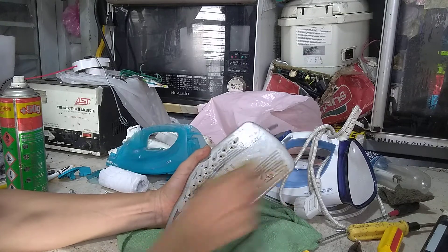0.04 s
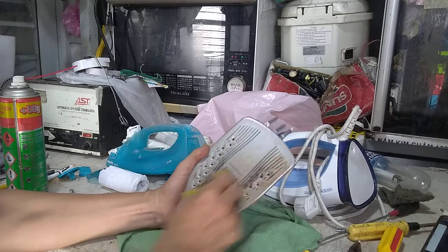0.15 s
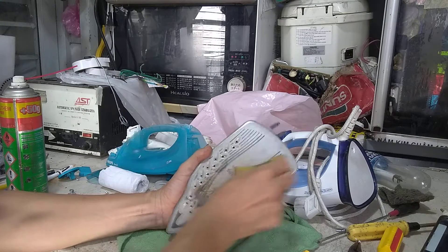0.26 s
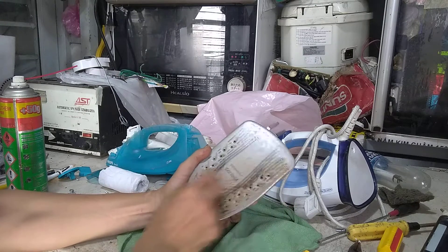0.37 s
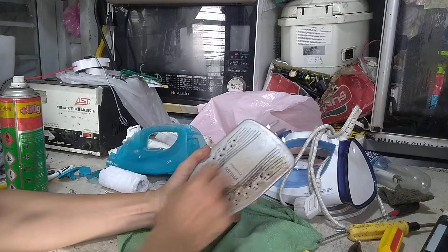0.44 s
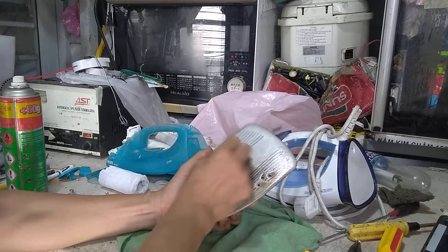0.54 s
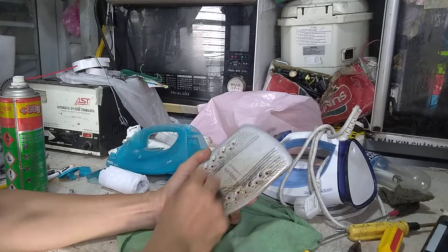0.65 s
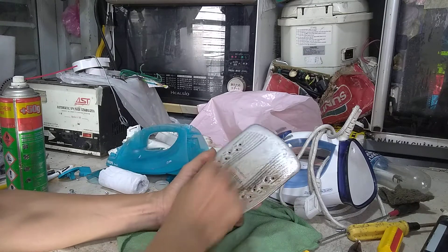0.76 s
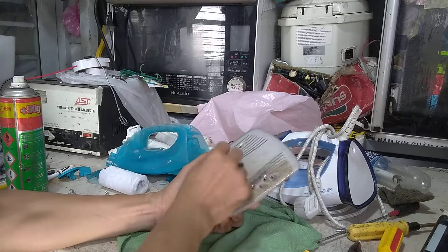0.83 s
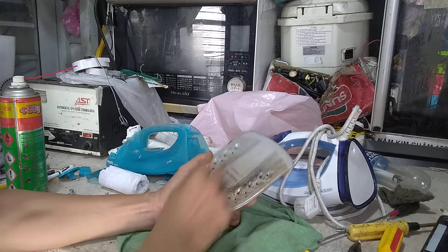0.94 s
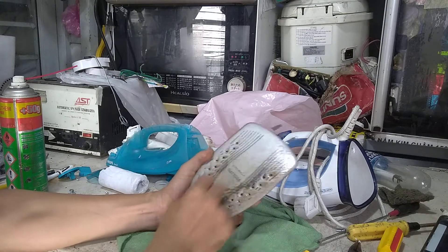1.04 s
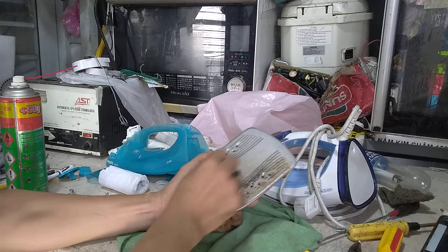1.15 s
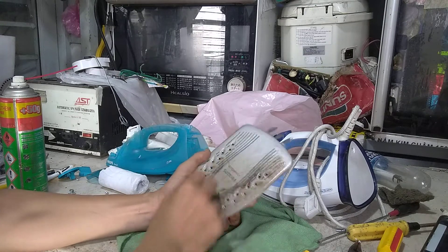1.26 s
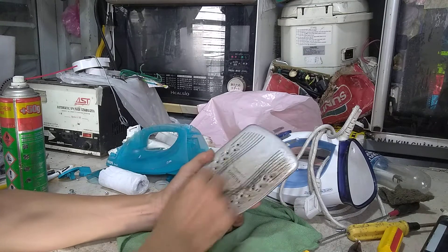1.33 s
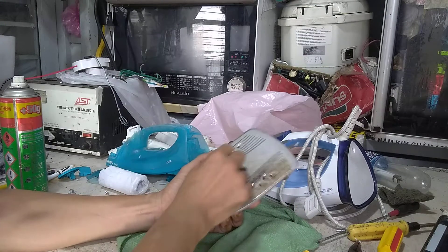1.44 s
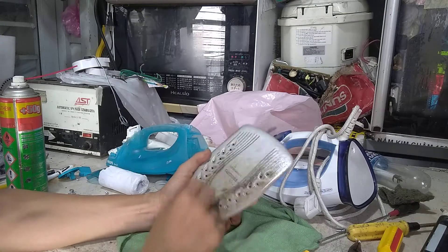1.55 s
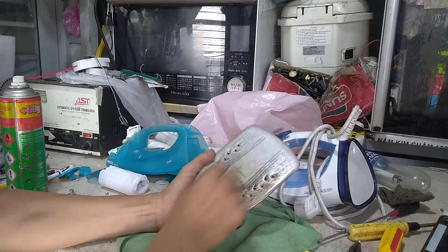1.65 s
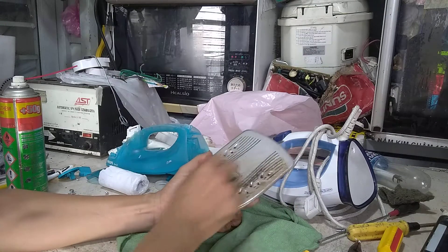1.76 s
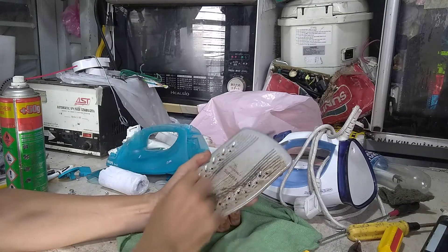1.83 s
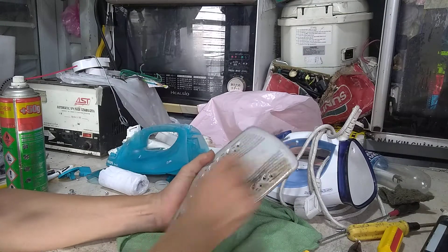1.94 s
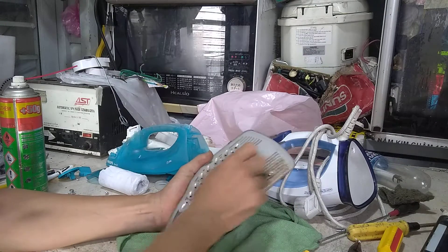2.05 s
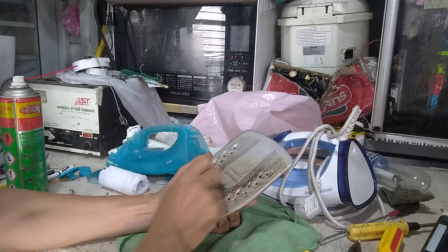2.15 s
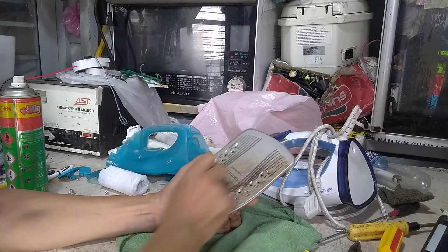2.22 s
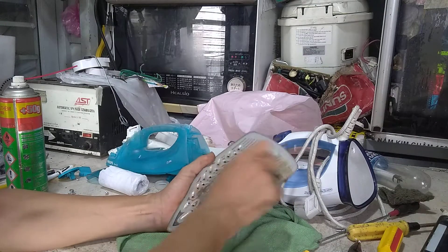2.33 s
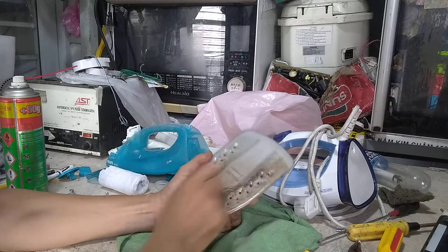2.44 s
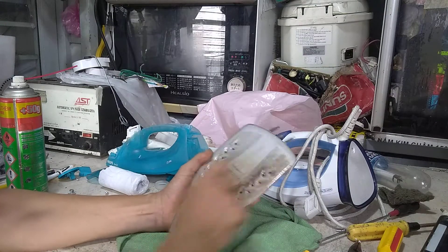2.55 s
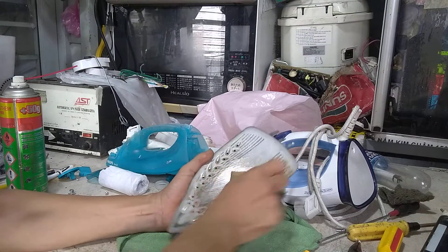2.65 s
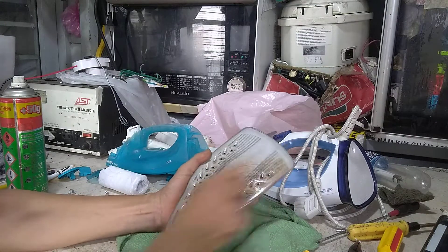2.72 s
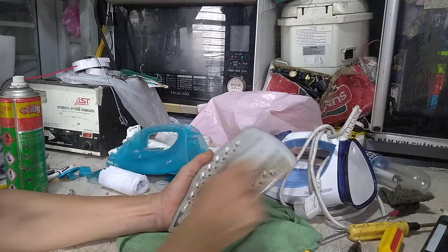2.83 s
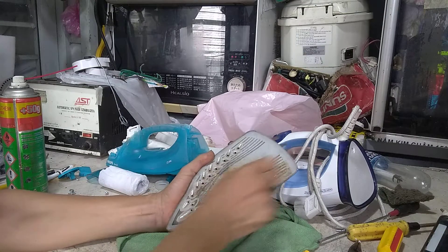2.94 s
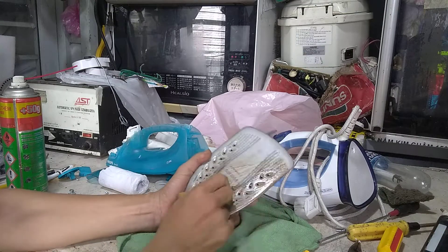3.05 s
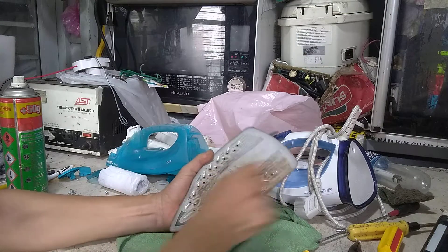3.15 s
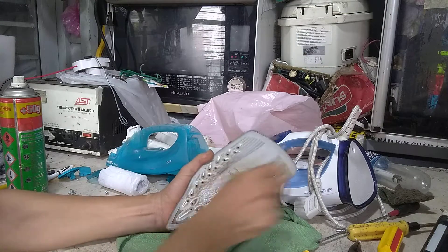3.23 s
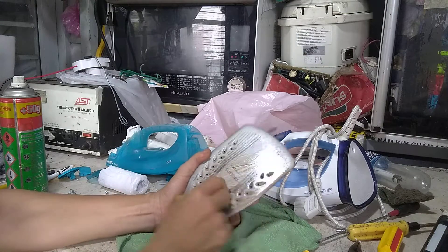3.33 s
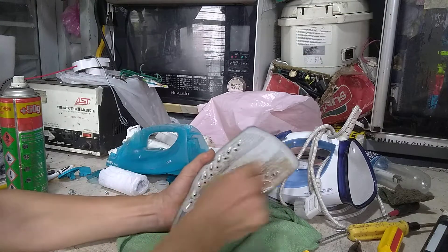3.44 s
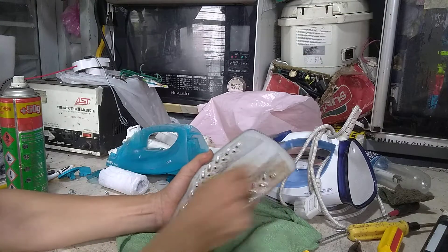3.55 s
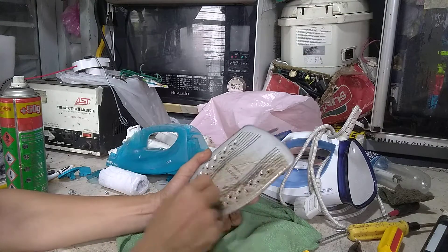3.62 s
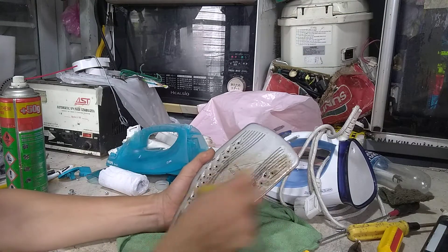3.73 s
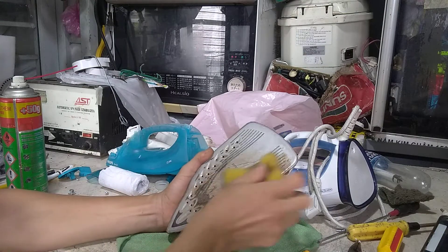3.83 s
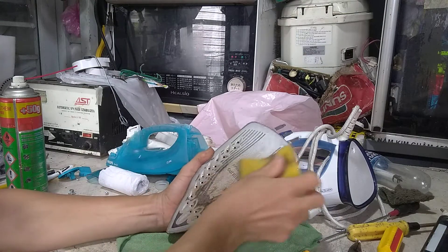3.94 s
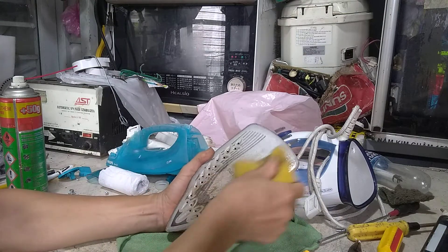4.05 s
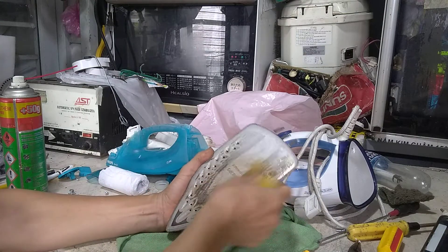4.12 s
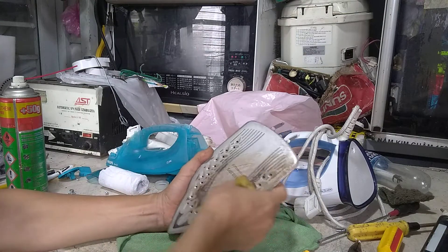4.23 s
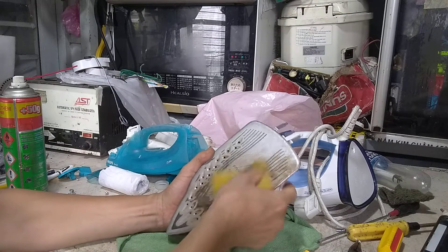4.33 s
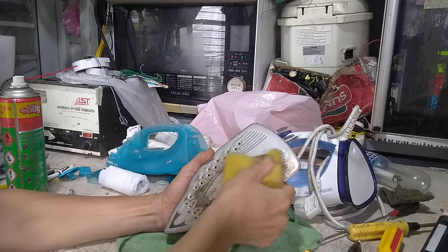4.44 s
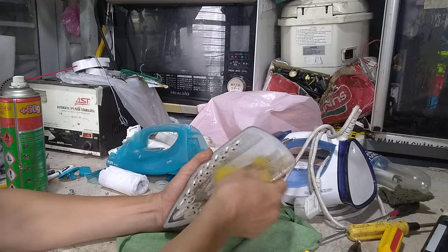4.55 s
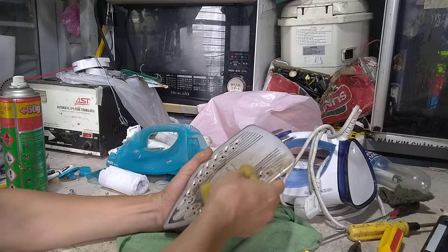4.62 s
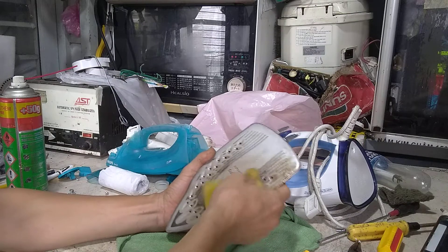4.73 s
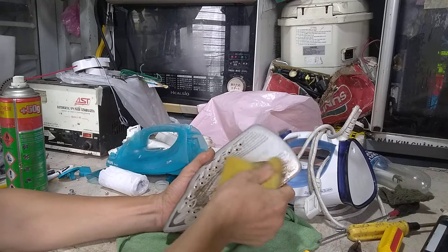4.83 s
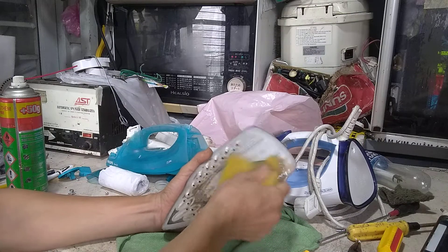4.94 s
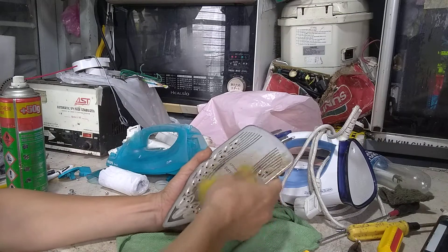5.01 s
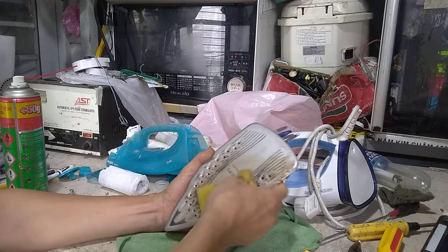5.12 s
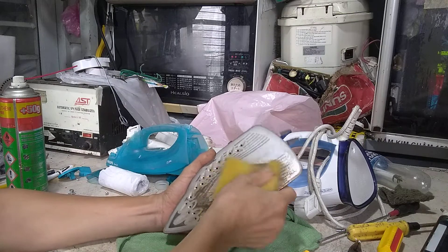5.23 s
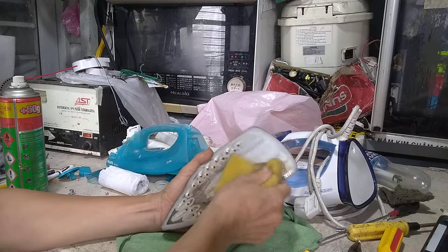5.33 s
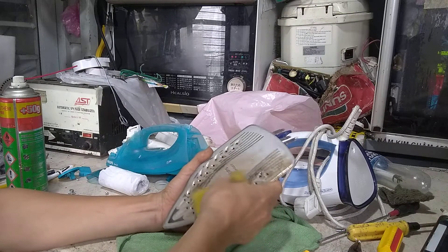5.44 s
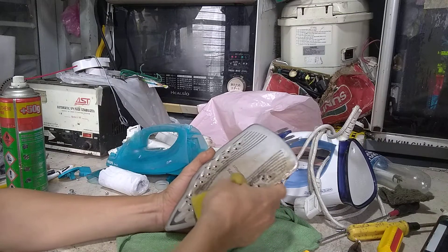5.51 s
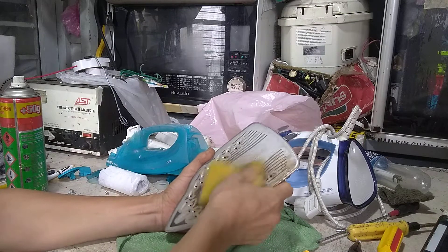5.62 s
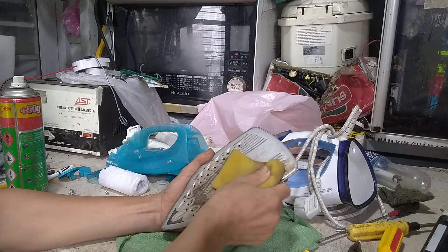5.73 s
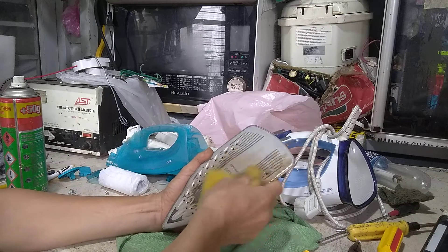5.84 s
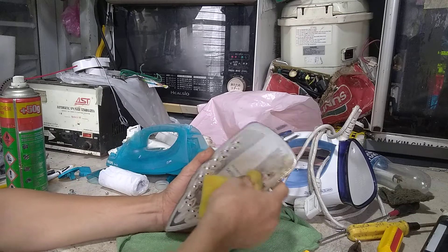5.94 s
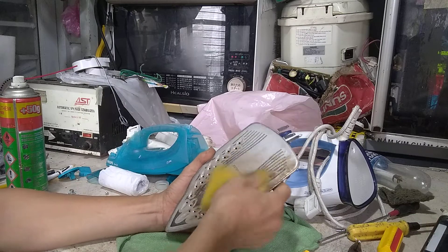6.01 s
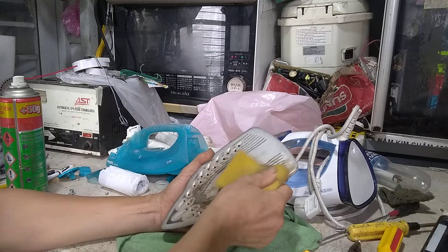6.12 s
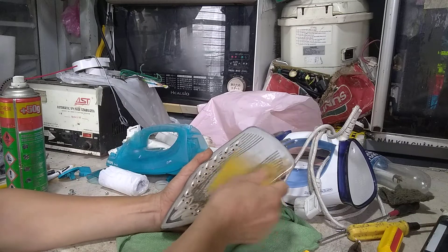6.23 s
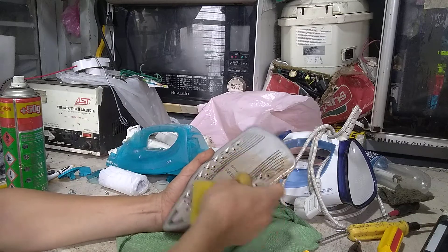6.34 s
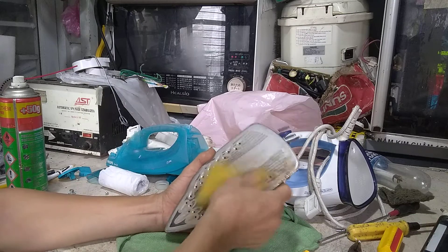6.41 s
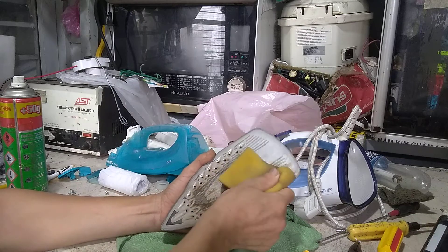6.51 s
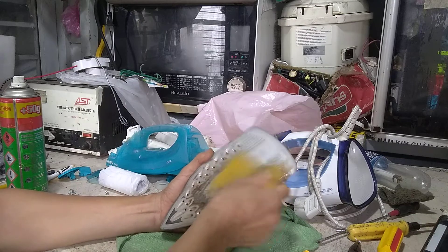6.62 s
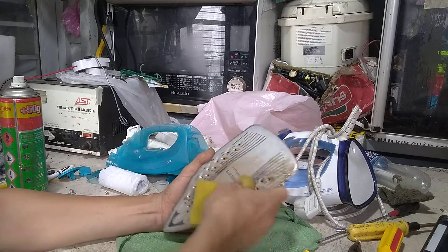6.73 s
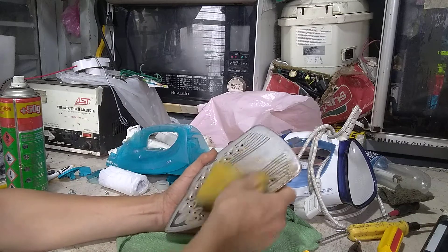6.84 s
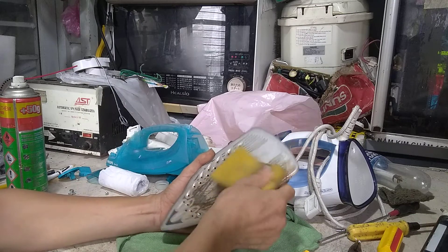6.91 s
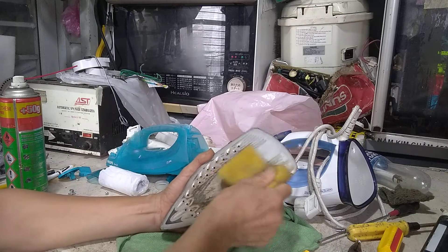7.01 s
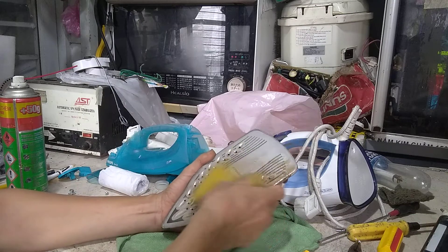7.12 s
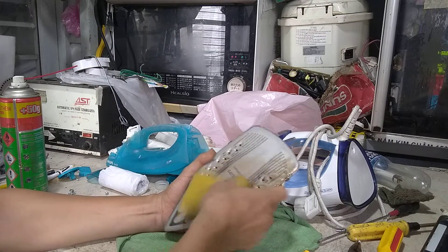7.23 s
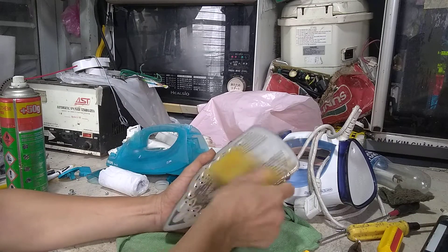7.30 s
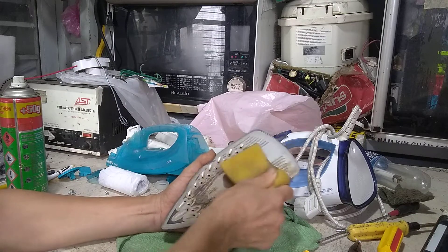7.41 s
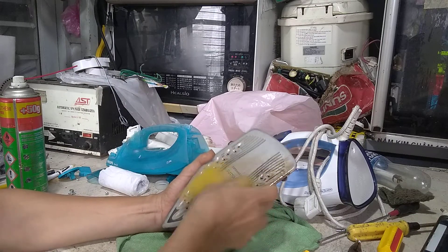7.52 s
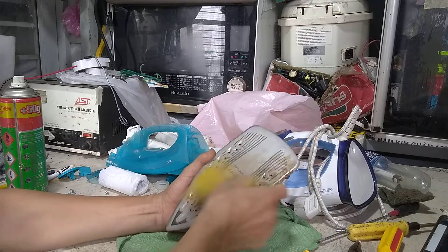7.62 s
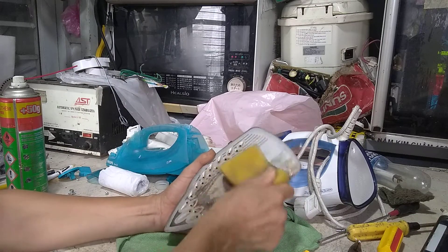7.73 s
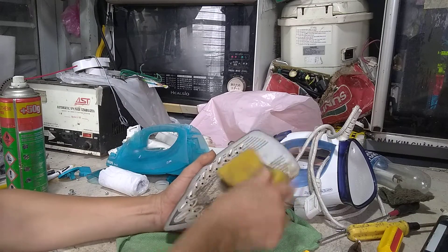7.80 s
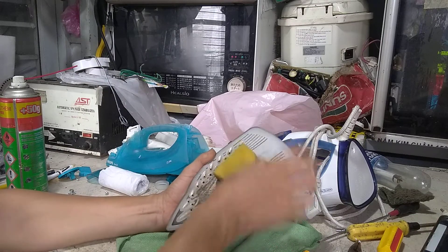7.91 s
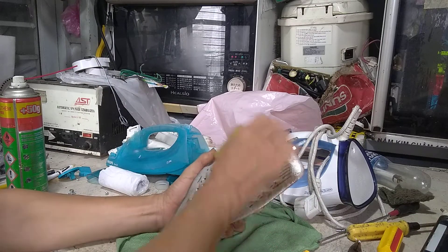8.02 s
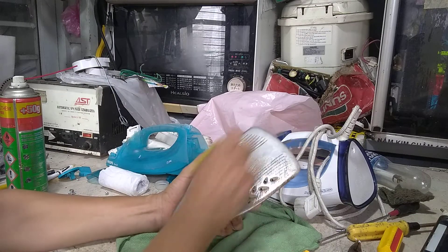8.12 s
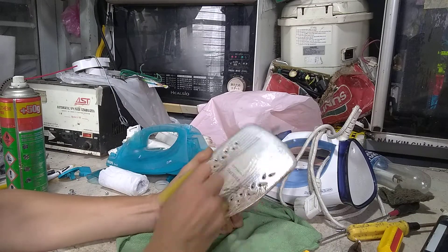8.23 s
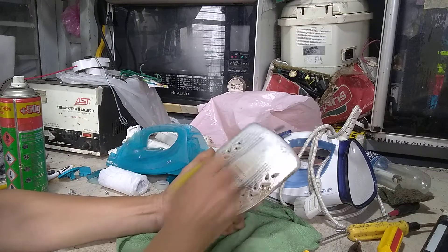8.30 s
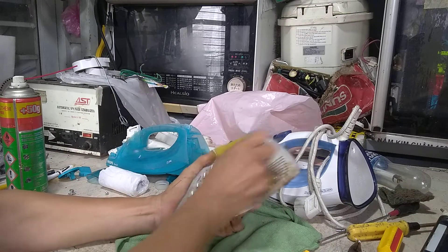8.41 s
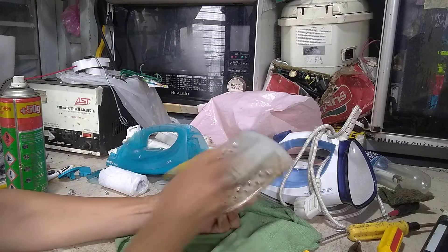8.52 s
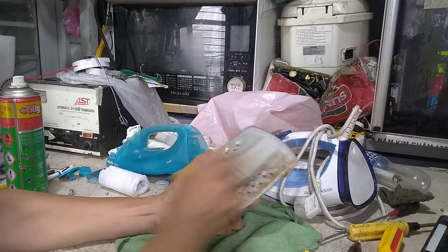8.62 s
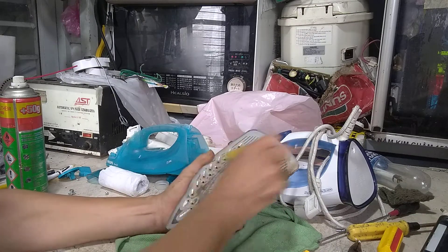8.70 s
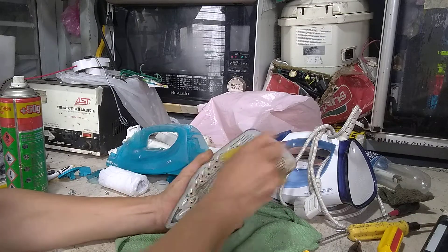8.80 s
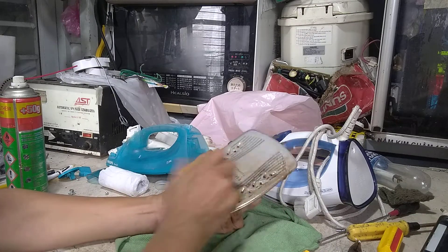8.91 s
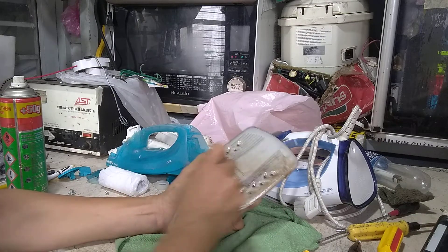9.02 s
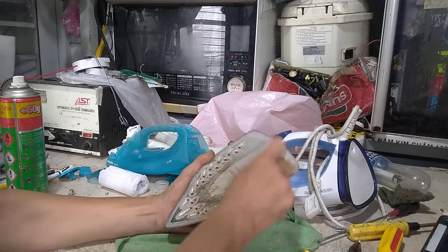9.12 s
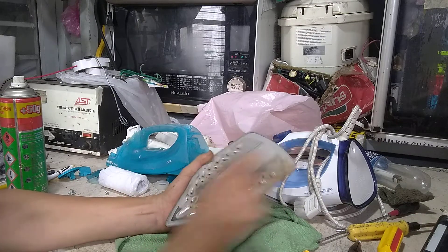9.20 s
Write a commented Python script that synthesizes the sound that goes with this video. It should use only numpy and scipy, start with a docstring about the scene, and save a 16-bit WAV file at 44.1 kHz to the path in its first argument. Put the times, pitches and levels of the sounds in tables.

```python
"""Scouring the plate of a clothes iron

A wet scouring sponge scrubs the metal soleplate of a hand-held clothes iron over a workbench.
Each stroke drags fibres across the plate (grains of noise coloured as hiss and rasp) and shakes the hollow
housing (low noise and ringing modes). Light glides, fizzing liquid, snags (decaying noise), squeaks (wavering
tones), bumps and a shifting grip join in over faint room air. Two close microphone ports listen."""
import sys
import numpy as np
from scipy import signal
from scipy.fft import rfft, irfft, next_fast_len
from scipy.io import wavfile

SR = 44100
rng = np.random.default_rng(int(sys.argv[2]) if len(sys.argv) > 2 else 0)


def output_pcm(signal):
    """Save a mono or channel-first signal as 16-bit PCM at the path in sys.argv[1].

    Samples are clipped to [-1, 1] before scaling.
    """
    pcm = np.clip(np.atleast_2d(signal).T, -1, 1) * 32767
    wavfile.write(sys.argv[1], SR, np.round(pcm).astype(np.int16))


N = 408366
TIME = np.arange(N) / SR


def from_db(db):
    """Decibels to gain."""
    return 10 ** (np.asarray(db) / 20)


def rms_one(x):
    """Scale to unit power."""
    return x / np.sqrt(np.mean(x ** 2) + 1e-20)


def ease(x):
    """A smooth step from 0 to 1."""
    return np.sin(np.pi / 2 * np.clip(x, 0, 1)) ** 2


def in_time(rows):
    """The columns of a control curve at every sample."""
    s, *columns = np.transpose(rows)
    return np.squeeze([np.interp(TIME, s, column) for column in columns])


def at_hz(points, hz):
    """Read a spectrum on a log-frequency axis."""
    knots, values = np.transpose(points)
    return np.interp(np.log(hz + 1), np.log(knots), values)


def swells(rows, width_s):
    """Gain of short bell-shaped swells."""
    gain = 0
    for s, level_db in rows:
        offset = np.minimum(np.abs(TIME - s) / width_s, 10)
        gain = gain + from_db(level_db) * np.exp(-offset ** 2)
    return gain


def drift(rate):
    """Slow chance with spread 1: a new value twice per cycle, straight lines between."""
    knots = rng.standard_normal(N // 32)
    return rms_one(np.interp(2 * rate * TIME, np.arange(len(knots)), knots))


def grains(per_s, spread_db):
    """Tiny slips at random moments, of uneven size, independent in two channels."""
    chance = rng.random((2, N), dtype=np.float32) * 2 - 1
    rank = np.abs(chance) * np.float32(SR / per_s) + 1e-9
    rarity = np.minimum(-np.log(rank), 4)
    sizes = np.exp(rarity * np.float32(spread_db * np.log(10) / 20))
    return np.sign(chance) * sizes * (rank < 1)  # only ranks below 1 sound


def colour(x, spectrum, edge_hz=15, resonances=()):
    """Give steady noise a spectrum with a steep lower edge and narrow resonances; unit power."""
    hz = np.fft.rfftfreq(4096, 1 / SR)
    lower_edge = np.sqrt(1 + np.minimum(edge_hz / (hz + 1), 2) ** 160)
    gain = from_db(at_hz(spectrum, hz)) / lower_edge
    for centre, width, boost_db in resonances:
        gain = gain * from_db(boost_db / (1 + (2 * (hz - centre) / width) ** 2))
    kernel = np.float32(np.fft.fftshift(irfft(gain)))
    return rms_one(signal.oaconvolve(np.float32(x), kernel[None], "same", axes=1))


def linger(gain, t60, room_db):
    """The cluttered room holds a little of the power for a moment."""
    r = from_db(-120 / (t60 * SR))  # twice 60 dB, because it is power that decays
    held_power = signal.lfilter([1 - r], [1, -r], gain ** 2 + 1e-18)
    return np.sqrt(gain ** 2 + from_db(room_db) ** 2 * held_power)


# Scouring strokes. Each row: moment the fibres bite in seconds, end in seconds,
# relative hiss level at mid-stroke in dB, rise in level over the stroke as the pressure changes in dB.
SCOURING_STROKES = [(0.073, 0.178, -38.5, 9), (0.195, 0.323, -37, -9), (0.336, 0.479, -40, 6),
                    (0.5, 0.554, -40, -11), (1.701, 1.746, -36.5, -16), (1.952, 2.054, -48.5, -18),
                    (2.13, 2.231, -51, -10), (2.308, 2.401, -40.5, -3.5), (2.406, 2.536, -55, -5),
                    (2.601, 2.707, -40.5, -3), (2.769, 2.828, -46.5, -1), (2.861, 2.975, -41, -11),
                    (3.149, 3.264, -39, 6), (3.332, 3.402, -47.5, 0), (3.452, 3.533, -46.0, -7),
                    (4.336, 4.443, -38.5, 3), (4.415, 4.509, -45.5, -4), (4.569, 4.7, -40.0, 10),
                    (4.771, 4.946, -37.5, -4), (5.009, 5.118, -37.0, -6.5), (5.182, 5.339, -34.0, 2.5),
                    (5.409, 5.544, -38.0, -6), (5.578, 5.783, -33.5, 24.5), (5.84, 5.944, -37.0, -10),
                    (6.017, 6.222, -38.0, -4.5), (6.275, 6.378, -36.5, -11), (6.381, 6.6, -34, 9.5),
                    (6.645, 6.767, -36.5, 1), (6.827, 7.039, -36, -8), (7.084, 7.241, -38.5, -7),
                    (7.274, 7.443, -32.5, 2), (7.5, 7.623, -38, -5), (7.671, 7.798, -33.5, -4),
                    (8.24, 8.295, -36.0, -11), (8.318, 8.442, -41.5, -12), (8.549, 8.615, -38.5, -1),
                    (8.644, 8.765, -40.0, -18)]
# The pad first slides softly (level relative to the bite), then its fibres take hold.
SLIDE_S, SLIDE_DB, BITE_S = 0.03, -23, 0.026
# Every stroke gets up to speed in the same time and slows over the same share of its length.
SPEED_UP_S, SLOWING_SHARE = 0.08, .52


def stroke_gains():
    """The pad slides, bites, presses on and slows to its turn; gain of the hiss."""
    power = np.zeros(N)
    for start, end, level_db, lean_db in SCOURING_STROKES:
        span = slice(max(int((start - SLIDE_S) * SR), 0), int(end * SR))
        t = TIME[span] - start
        along = np.clip(t / (end - start), 0, 1)
        motion = ease((t + SLIDE_S) / SPEED_UP_S) * ease((1 - along) / SLOWING_SHARE)
        friction = from_db(SLIDE_DB) + ease(t / BITE_S)
        pressure = from_db(level_db + lean_db * (along - .5))
        power[span] += (motion * friction * pressure) ** 2
    return np.sqrt(power)


# The pad runs into the plate's rim and grates over it.
# Each row: centre of the swell in seconds, relative rasp level in dB.
RIM_GRATINGS = [(2.645, -52.5), (8.27, -49.5), (8.581, -41.5)]
RIM_HIT_S = .017
# Rasp gain relative to the hiss gain: lower when the pad is flat; fingers bearing down raise it.
RASP_FLAT_DB, RASP_EDGE_DB, RASP_FINGERS_DB = -25.5, -14.5, 13


def rasp_gains(hiss_gain, flat, covered):
    """The rasp follows the hiss, stronger on the pad's edge and under fingers, and swells at the rim."""
    rasp_db = RASP_FLAT_DB * flat + RASP_EDGE_DB * (1 - flat) + RASP_FINGERS_DB * covered
    return np.hypot(hiss_gain * from_db(rasp_db), swells(RIM_GRATINGS, RIM_HIT_S))


def bench_echo(x, delay_s=.0024, sway_s=0.000492, echo_db=-1.0):
    """The bench returns the scratching; the path changes as the hand moves."""
    late = TIME - delay_s - sway_s * drift(rate=1.2)
    echo = np.array([np.interp(late, TIME, channel) for channel in x])
    return rms_one(x + from_db(echo_db) * echo)


def muffled(x, corner_hz=8500):
    """Fingers over the contact take off the top of the hiss."""
    lowpass = signal.butter(1, min(corner_hz, .45 * SR), fs=SR, output="sos")
    return rms_one(signal.sosfilt(lowpass, x))


# Spectra of the flat pad's hiss, of the hiss of its edge, and of the rasp.
# Each row: frequency in Hz, relative level in dB.
FLAT_PAD_HISS = [(4750, -30.5), (5100, -6), (5700, -3), (6400, -3.5), (6900, -4), (7500, -2), (8150, 0.5),
                 (8900, -3), (9900, -2.5), (11700, -7), (12400, -7.5), (13200, -4.5), (14200, -23.5)]
PAD_EDGE_HISS = [(4750, -2.5), (5100, -1), (5700, 0), (6300, -0.3), (7000, -1), (8000, -2), (9500, -2.5),
                 (11500, -5.5), (13000, -7.5), (14200, -16)]
FIBRE_RASP = [(600, 3), (1000, 1.5), (1500, 0), (2200, -11), (2900, 1.5), (3800, 8), (4600, -2.5),
              (5200, -3), (6000, -26)]
# Resonances of the soleplate, and of its rim woken by the edge of the pad.
# Each row: centre in Hz, width in Hz, boost in dB (negative is a dip).
PLATE_RESONANCES = [(2804, 40, 12), (2913, 30, 6), (3063, 40, 8), (3866, 45, 7), (5689, 55, 7),
                    (5839, 55, 7), (6193, 70, 4), (6950, 200, -2), (7477, 130, 4), (8170, 170, 2),
                    (8960, 250, -1.5), (10034, 60, 4.5), (10880, 250, 2), (12185, 40, 4), (13717, 80, 6),
                    (13940, 80, 7)]
RIM_RESONANCES = [(1423, 120, 7.5), (1886, 490, 21.5), (2786, 64, 14.5), (3050, 53, 11.5), (3800, 80, -3.5)]
HISS_EDGE_HZ = 5020


def scouring(hiss_gain, rasp_gain, flat, covered):
    """Fibres scratch the plate; flat pad and edge differ in colour, and the friction flutters."""
    flat_hiss = colour(grains(per_s=20000, spread_db=2.0), FLAT_PAD_HISS, HISS_EDGE_HZ, PLATE_RESONANCES)
    edge_hiss = colour(grains(per_s=14000, spread_db=4.5), PAD_EDGE_HISS, HISS_EDGE_HZ)
    open_hiss = np.sqrt(flat) * flat_hiss + np.sqrt(1 - flat) * edge_hiss
    finger_hiss = muffled(colour(grains(per_s=14000, spread_db=5.0), PAD_EDGE_HISS, HISS_EDGE_HZ))
    hiss = np.sqrt(1 - covered) * open_hiss + np.sqrt(covered) * finger_hiss

    flat_rasp = colour(grains(per_s=6000, spread_db=0.5), FIBRE_RASP, 600, PLATE_RESONANCES)
    edge_rasp = colour(grains(per_s=4600, spread_db=2.5), FIBRE_RASP, 610, RIM_RESONANCES)
    rasp = np.sqrt(flat) * flat_rasp + np.sqrt(1 - flat) * edge_rasp

    flutter = drift(rate=220)  # shared by hiss and rasp
    hiss = bench_echo(hiss) * linger(hiss_gain * from_db(0.85 * flutter), t60=0.065, room_db=-7)
    rasp = bench_echo(rasp) * linger(rasp_gain * from_db(0.74 * flutter), t60=0.14, room_db=-4)
    return from_db(1.18) * hiss + from_db(0.5) * rasp


# Modes of the hollow housing. Each row: frequency in Hz, relative level in dB, 60 dB decay in seconds.
HOUSING_MODES = [(210, -21, 0.098), (311, -4, 0.12), (410.2, -2, 0.13), (469, -5, 0.062)]


def housing(force):
    """The modes of the iron's shell, set ringing by a force."""
    out = 0
    for hz, level_db, t60 in HOUSING_MODES:
        r, w = from_db(-60 / (t60 * SR)), 2 * np.pi * hz / SR
        resonator = [1, -2 * r * np.cos(w), r * r]
        out = out + from_db(level_db) * signal.lfilter([.5, 0, -.5], resonator, force + 1e-18)
    return out


# Spectra of the housing's rumble and of the dull thud. Each row: frequency in Hz, relative level in dB.
HOUSING_RUMBLE = [(60, -38), (150, -24), (200, 1.5), (270, -1), (410, 0.5), (550, -4), (750, -12.5),
                  (1000, -27), (1600, -51.5)]
DULL_THUD = [(25, -22), (60, -10.5), (110, -9), (190, 4), (250, -2), (350, -5), (600, -54.5)]


def shaking(gain, flat, give_db=-55, edge_db=3.0):
    """Friction shakes the housing; the thud, fuller on the pad's edge, levels off under a hard push."""
    force = colour(grains(per_s=1500, spread_db=2.5), HOUSING_RUMBLE)
    shell = from_db(-2.5) * force + from_db(-10.0) * rms_one(housing(force))
    push = gain / np.hypot(1, gain / from_db(give_db))  # the soft hand yields to a hard push
    thud_noise = colour(grains(per_s=810, spread_db=1.0), DULL_THUD)
    thud = from_db(edge_db * (1 - flat) - 0.1) * push * thud_noise
    return shell * linger(gain, t60=0.36, room_db=-3.5) + thud


# Light passes that slide on the wet film. Each row: start in seconds, end in seconds, relative level in dB.
LIGHT_GLIDES = [(0.43, 0.624, -54), (0.61, 0.777, -63), (0.767, 0.904, -60.5), (0.926, 1.07, -60.5),
                (1.06, 1.21, -60), (1.245, 1.34, -66.5), (1.353, 1.485, -61), (1.484, 1.86, -60.5),
                (1.828, 1.917, -65), (2.44, 2.92, -62.5), (2.992, 3.124, -59.5), (3.233, 3.494, -67),
                (4.096, 4.278, -59), (8.13, 8.306, -61.5), (8.402, 8.61, -68), (8.662, 8.81, -55),
                (9.047, 9.21, -62), (9.183, 9.32, -60)]
# Fizz of the wet film under the resting pad; it dies away twice as the pad lifts.
# Each row: time in seconds, relative level in dB.
FILM_FIZZ = [(0, -64), (.9, -69.5), (1.35, -72), (2.2, -67.5), (3.5, -67.5), (3.75, -76.5), (4.08, -81.5),
             (4.35, -71.5), (7.83, -71.5), (7.95, -81), (8.08, -80), (8.3, -58), (9.25, -76)]


def glide_gains():
    """Each light pass swells and fades in one arch above the fizz of the film."""
    power = from_db(in_time(FILM_FIZZ)) ** 2
    for start, end, level_db in LIGHT_GLIDES:
        span = slice(int(start * SR), int(end * SR))
        arch = np.sin(np.pi * (TIME[span] - start) / (end - start))
        power[span] += (from_db(level_db) * arch) ** 2
    return np.sqrt(power)


def gliding():
    """The wet film hisses and fizzes faintly, with a soft rub below."""
    film = colour(grains(per_s=2900, spread_db=-0.5), PAD_EDGE_HISS, HISS_EDGE_HZ)
    rub = from_db(-16) * colour(grains(per_s=11000, spread_db=2.0), FIBRE_RASP, edge_hz=600)
    rub += from_db(-30) * colour(grains(per_s=570, spread_db=3.5), HOUSING_RUMBLE)
    return glide_gains() * from_db(0.16 + 2.2 * drift(rate=62)) * (film + rub)


# Fibres catch and let go. Each row: time in seconds, relative tick level in dB,
# relative rasp level in dB, 60 dB ring-down in seconds (a fainter common tail is added).
FIBRE_SNAGS = [(0.213, -44, -41.5, 0.2), (0.242, -25, -33.5, 0.099), (0.517, -27, -50, 0.014),
               (.5228, -39.5, -56, .035), (1.709, -30, -86, 0.027), (2.8795, -37, -71, .02),
               (2.916, -35, -61, 0.025), (3.4693, -25, -50.5, 0.049), (4.4493, -30, -59, 0.034),
               (5.496, -45, -46.5, 0.093), (6.03, -35, -59, .02), (6.391, -27.5, -56.5, 0.042),
               (6.398, -27, -54, 0.026), (6.452, -25, -48.5, 0.042), (6.836, -30.5, -68, 0.025),
               (7.687, -40, -60, 0.022), (8.271, -39, -44, 0.025)]


def snags(tail_db=-21, tail_t60=0.077):
    """A caught fibre snaps free; the plate and the things nearby scatter the tick unevenly."""
    tick, rasp = np.zeros((2, N))
    t = TIME[:SR // 4]
    for s, tick_db, rasp_db, t60 in FIBRE_SNAGS:
        span = slice(int(s * SR), int(s * SR) + len(t))
        decay = np.hypot(from_db(-60 * t / t60), from_db(tail_db - 60 * t / tail_t60))
        decay *= np.minimum(t / .0003, 1)  # brief attack, in seconds
        tick[span] += from_db(tick_db) * decay
        rasp[span] += from_db(rasp_db) * decay
    scatter = grains(per_s=18000, spread_db=-2.5)
    bright = colour(scatter, PAD_EDGE_HISS, HISS_EDGE_HZ)
    coarse = colour(scatter, FIBRE_RASP, edge_hz=2550, resonances=PLATE_RESONANCES)
    return tick * bright + rasp * coarse


# Stick-slip on the wet metal. Each row: start in seconds, fall to 1/e in seconds,
# mean pitch in Hz, relative level in dB.
STICK_SLIPS = [(.5225, 0.0075, 6370, -32), (0.52, 0.0035, 7600, -32), (1.092, .01, 6200, -54),
               (1.648, 0.0057, 6270, -55.5), (1.657, .008, 6200, -54), (1.7096, 0.015, 6200, -25.5),
               (2.881, 0.05, 5120, -43), (3.475, 0.011, 5010, -44)]


def squeaks(waver=0.007, attack_s=0.00024):
    """For some milliseconds the slips lock into a wavering tone."""
    out, wander = np.zeros((2, N)), drift(rate=540)
    t = TIME[:SR // 10]
    for s, length, hz, level_db in STICK_SLIPS:
        span = slice(int(s * SR), int(s * SR) + len(t))
        shape = (1 - np.exp(-t / attack_s)) * np.exp(-(t / length) ** 4)
        phase = 2 * np.pi * np.cumsum(hz * (1 + waver * wander[span])) / SR
        tone = np.sqrt(2) * np.array([np.sin(phase), np.cos(phase)])
        out[:, span] += from_db(level_db) * shape * tone
    return out


# The hand bumps the iron. Each row: time in seconds, relative force in dB.
HAND_BUMPS = [(3.233, -54.5), (3.476, -70), (5.498, -32.5), (5.752, -34.5), (8.276, -37.5), (8.568, -34.5)]


def bumps(softness_hz=600):
    """Single blows ring the housing, softened by a lowpass."""
    force = np.zeros(N)
    for s, level_db in HAND_BUMPS:
        force[int(s * SR)] = from_db(level_db)
    ringing = housing(force + 1e-12 * rng.standard_normal(N))
    return signal.sosfilt(signal.butter(2, softness_hz, fs=SR, output="sos"), ringing)


# The iron shifts softly in the hand. Each row: centre of the swell in seconds, peak level in dB.
GRIP_SHIFTS = [(3.6, -81), (3.8, -77), (3.97, -73), (5.36, -63), (7.89, -66.5), (8.1, -64.5)]
SHIFT_S = 0.067


def handling():
    """Skin rubs on the housing as the grip shifts."""
    return swells(GRIP_SHIFTS, SHIFT_S) * colour(grains(per_s=300, spread_db=2.5), HOUSING_RUMBLE)


# Spectrum of the workshop's air. Each row: frequency in Hz, relative level in dB.
WORKSHOP_AIR = [(25, 6.5), (60, -13), (120, -4), (200, 0.5), (400, -1), (700, -7.5), (1400, -10),
                (2500, -15), (4500, -13), (5300, -25.5), (9000, -37), (14000, -24.5)]


def room_air():
    """The still air of the workshop: steady, faint coloured noise."""
    return from_db(-69.0) * colour(rng.standard_normal((2, N)), WORKSHOP_AIR, edge_hz=36)


# Grip on the pad. Each row: time in seconds, share of the pad that lies flat on the plate (0-1),
# share of the hiss muffled by the fingers (0-1).
PAD_GRIP = [(0, 0.43, 0), (3.6, 0.31, 0), (4.4, 0.95, 0.07), (7.8, 0.82, 0), (8.2, 0.95, 0.6)]
# How strongly the friction shakes the housing, as the hold on the iron changes.
# Each row: time in seconds, drive relative to the hiss gain in dB.
HOUSING_SHAKE = [(.25, -22.5), (.55, -18.5), (1.7, -16), (2.0, -14.5), (2.35, -13.5), (2.65, -13.5),
                 (3.25, -15), (4.4, -18), (4.85, -20), (5.25, -13), (5.47, -4.5), (5.87, -7.5),
                 (6.1, -12.5), (6.9, -16), (7.15, -12.5), (7.35, -17), (7.75, -16), (8.26, -6), (8.4, -7.5),
                 (8.58, -2.5), (8.7, -13.5)]


def scene(stroke_db=0.03, uneven_db=0.66):
    """Scrubbing, its small accidents and the still air of the workshop."""
    flat, covered = np.clip(in_time(PAD_GRIP), 0, 1)
    hiss_gain = stroke_gains() * from_db(stroke_db + uneven_db * drift(rate=25))
    rasp_gain = rasp_gains(hiss_gain, flat, covered)
    housing_gain = hiss_gain * from_db(in_time(HOUSING_SHAKE))
    scrubbing = scouring(hiss_gain, rasp_gain, flat, covered) + shaking(housing_gain, flat) + gliding()
    return scrubbing + snags() + squeaks() + bumps() + handling() + room_air()


def to_bins(x):
    """Spectrum of a signal and the frequency of each bin."""
    size = next_fast_len(N, True)
    return rfft(x, size), np.fft.rfftfreq(size, 1 / SR)


# Likeness of the two ports. Each row: frequency in Hz, shared part of the sound (0-1).
PORT_LIKENESS = [(40, .5), (150, 0), (500, 0), (850, .995), (5300, .995), (5500, .05), (7000, .55),
                 (14000, .1)]
# Balance of the two ports. Each row: frequency in Hz, left minus right in dB.
PORT_BALANCE = [(30, -4), (130, 3.5), (400, 6.5), (700, 3.5), (1100, 0), (5000, -0.6), (7800, 0.5),
                (9200, 2.5), (13000, 0.5)]
PORT_LAG_S = .000452
CUTOFF_HZ = 14280


def record(dry):
    """The right port hears the direct sound later and inverted, plus its own diffuse part; the top is cut."""
    (left, diffuse), hz = to_bins(dry)
    alike = np.clip(at_hz(PORT_LIKENESS, hz), 0, .995)
    lag = np.exp(-2j * np.pi * hz * PORT_LAG_S)
    right = -alike * lag * left + np.sqrt(1 - alike ** 2) * diffuse
    ratio = from_db(at_hz(PORT_BALANCE, hz))
    even_power = np.sqrt(2 / (1 + ratio ** 2))  # the balance leaves the summed power alone
    ports = irfft(np.array([left * ratio, right]) * even_power)[:, :N]
    return signal.sosfilt(signal.ellip(10, .1, 80, CUTOFF_HZ, fs=SR, output="sos"), ports)


dry = scene()
out = record(dry)
output_pcm(out)
```